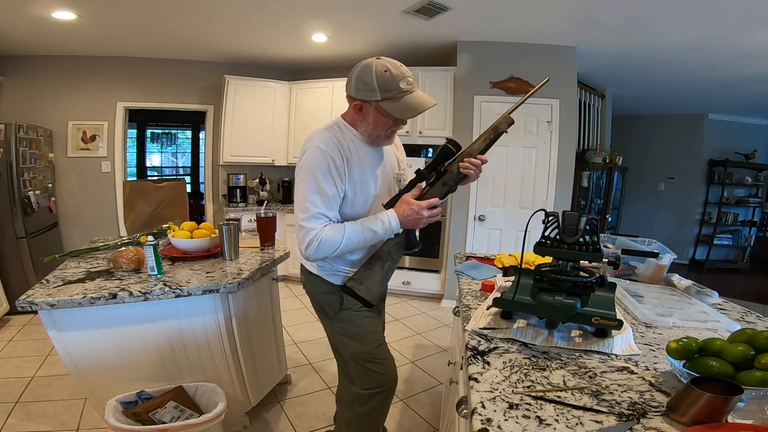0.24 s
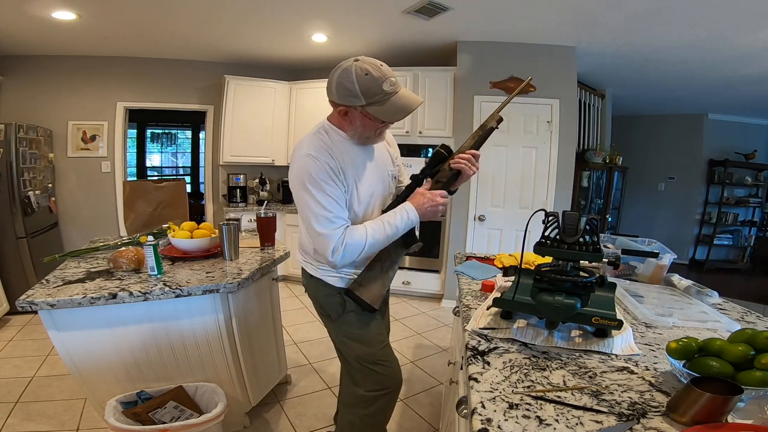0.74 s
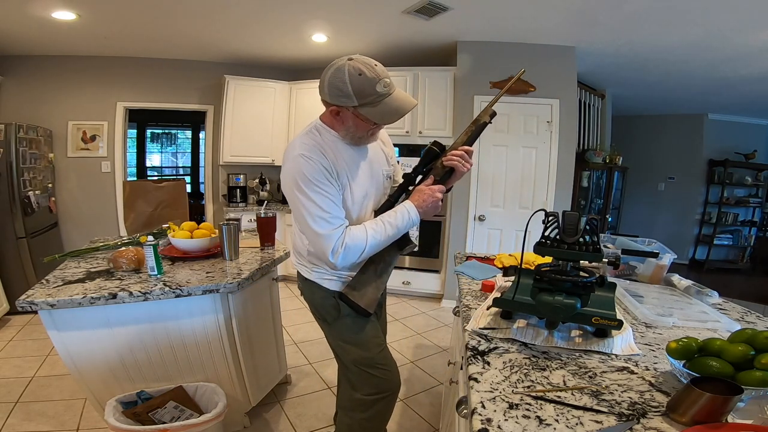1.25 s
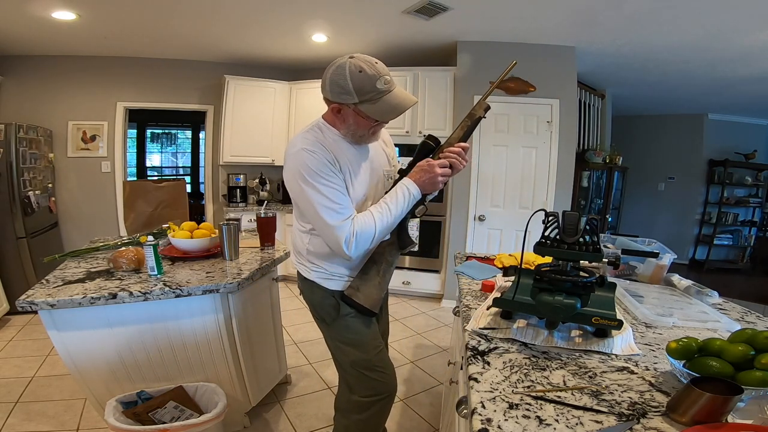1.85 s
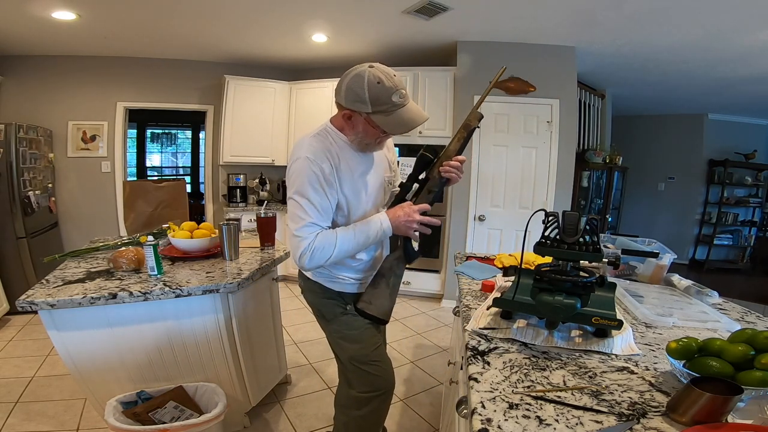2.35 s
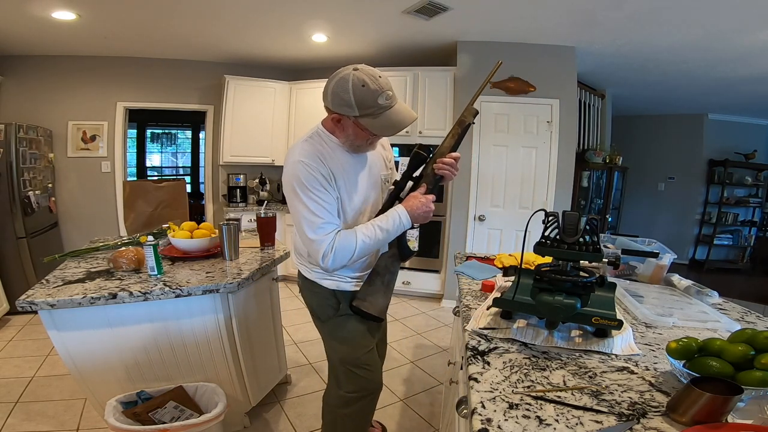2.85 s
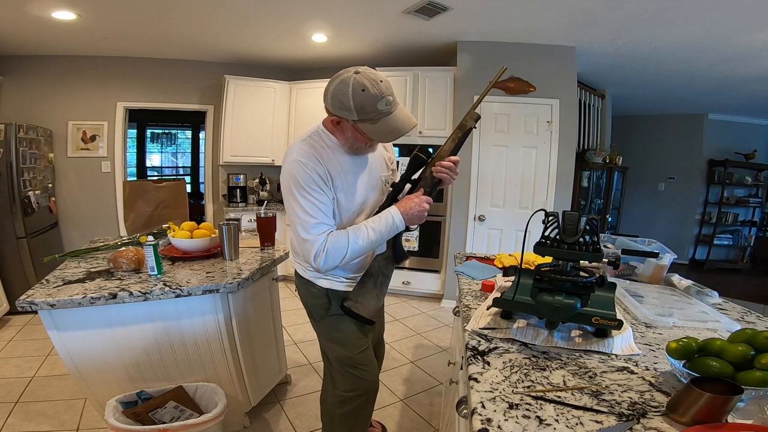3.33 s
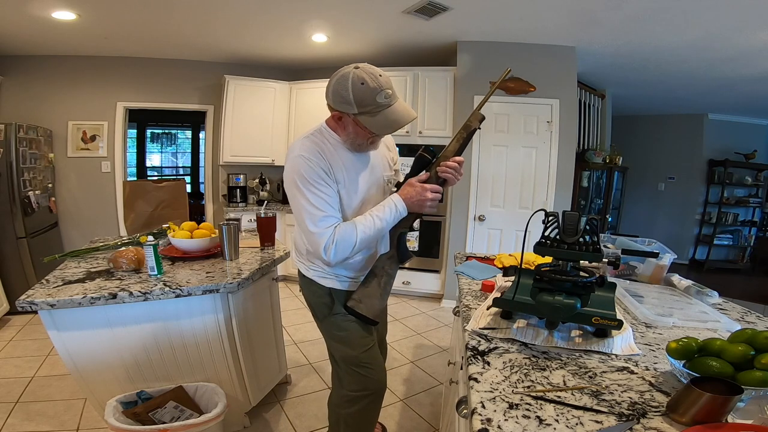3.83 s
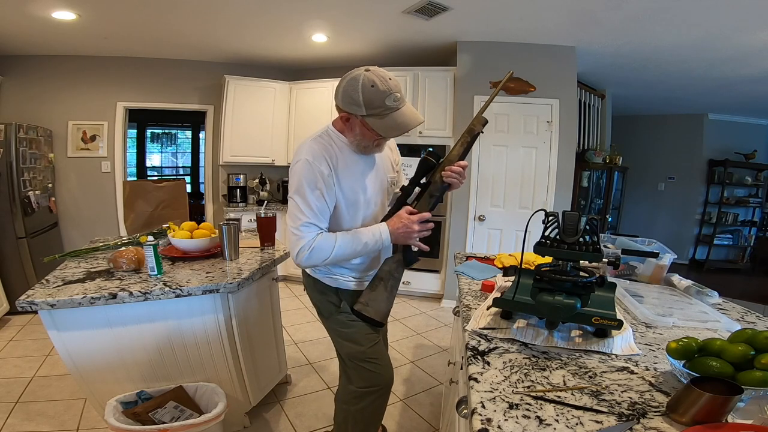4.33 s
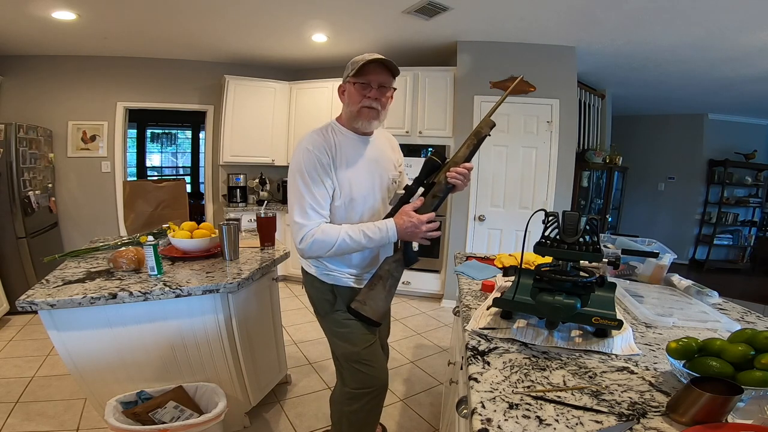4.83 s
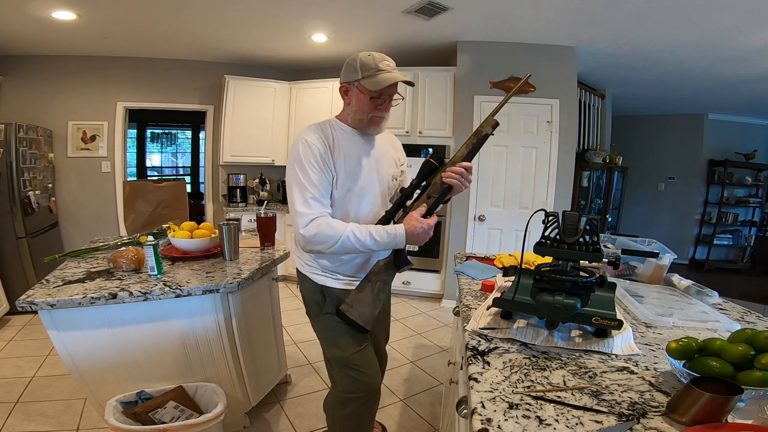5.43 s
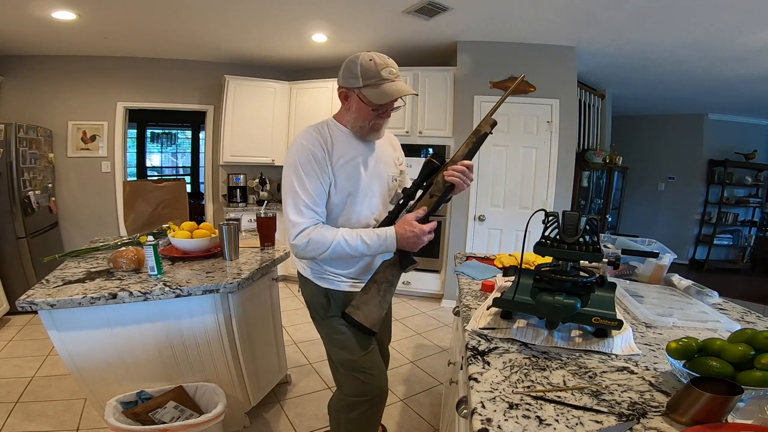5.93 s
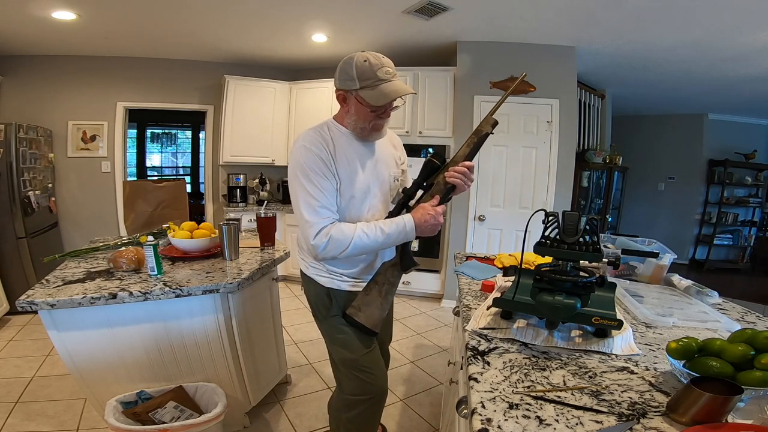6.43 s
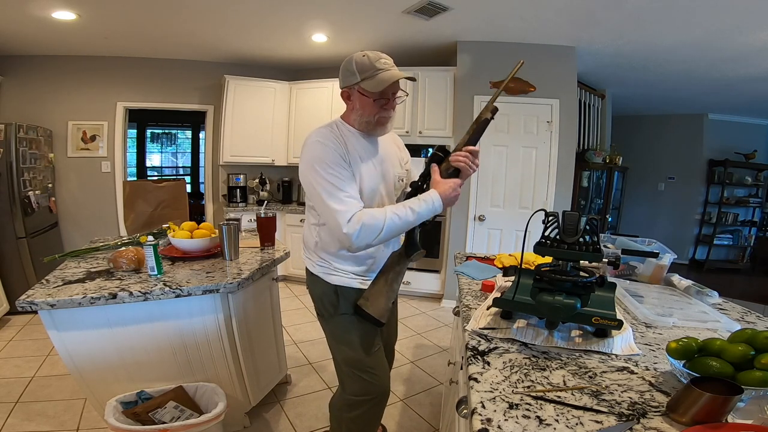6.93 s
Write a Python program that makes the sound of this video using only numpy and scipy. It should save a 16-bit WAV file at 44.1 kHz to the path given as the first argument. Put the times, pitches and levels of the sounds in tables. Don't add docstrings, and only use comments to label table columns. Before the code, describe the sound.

A close, hard-surfaced kitchen with low house rumble, faint hiss and wavering appliance hum. At 0 s the end of a bolt scrape meets a metallic clack and a hollow latch knock in the rifle stock. Very faint finger ticks follow. At 1.42 s the bolt releases, knocks along its rails and slams at about 1.46 s, a bright burst of rattling steel with quick bounces, a microphone overload pop and a ringing room tail. From 2.13 s it is drawn again in gritty clicks, strikes its stop at 2.33 and latches at 2.47. It slams again at 3.56. The third draw runs from 4.1 to 4.43, with a heavier low thump and latch, while the stereo image shrinks almost to mono. Faint hum, skin and sling ticks fill the wait as the image reopens, then a slightly softer slam lands at 6.49, ringing away to light touches near 7 s.

```python
import sys
import numpy as np
from scipy import signal
from scipy.io import wavfile
from scipy.ndimage import uniform_filter1d

SR = 44100
rng = np.random.default_rng(int(sys.argv[2]) if len(sys.argv) > 2 else 0)


def gain_from_db(level_db):
    decades = np.asarray(level_db, float) / 20
    return 10 ** decades


def log_audio(samples):
    frames = np.atleast_2d(samples).T
    limited = np.clip(frames, -1, 1)
    pcm = np.round(limited * 32767).astype(np.int16)
    wavfile.write(sys.argv[1], SR, pcm)


N = 316461


def evened(x):
    return x / np.sqrt(np.mean(x ** 2) + 1e-20)


def read(points, hz):
    f, value = np.transpose(points)
    return np.interp(np.log(hz + 1), np.log(f + 1), value)


def curve(rows, column):
    rows = np.array(rows)
    return np.interp(np.arange(N) / SR, rows[:, 0], rows[:, column])


def split(x, hz, order=2):
    low = signal.sosfiltfilt(signal.butter(order, hz, fs=SR, output="sos"), x)
    return low, x - low


def slow_noise(count, seconds):
    span = round(seconds * SR)
    return uniform_filter1d(uniform_filter1d(rng.standard_normal((count, N)), span), span)


def noise_pair(count, size, same, shape_db):
    hop = size // 4
    frames = count // hop + 5
    hz = np.fft.rfftfreq(size, 1 / SR)[:, None]
    a, b, c, d = rng.standard_normal((frames, len(hz), 4)).T
    like = np.clip(read(same, hz), -1, 1)
    left = a + 1j * b
    right = like * left + np.sqrt(1 - like ** 2) * (c + 1j * d)
    spectra = np.array([left, right]) * gain_from_db(shape_db(hz, np.arange(frames) * hop / SR))
    return signal.istft(spectra, nperseg=size, noverlap=size - hop)[1][:, :count]


def ring(modes, lo_hz, hi_hz, blur=1):
    t = np.arange(3000) / SR
    h = np.zeros(len(t))
    for hz, width, db in modes:
        decay = np.exp(-np.pi * width * blur * t)
        h += gain_from_db(db) * np.sqrt(width) * decay * np.sin(2 * np.pi * hz * t)
    h = signal.sosfilt(signal.butter(2, [lo_hz, hi_hz], "band", fs=SR, output="sos"), h)
    return h / np.linalg.norm(h)


def knocked(rows, h, duck_db):
    knock_ms = .8
    knocks = np.zeros(N)
    h = np.convolve(h, np.hanning(round(knock_ms * SR / 1000)))
    for s, db in rows:
        at = round(s * SR)
        knocks[at] = gain_from_db(db - duck_db[at + 90])
    return signal.oaconvolve(knocks, h / abs(h).max())[:N]


# t/s, bass side level/dB
FOLD = [
    (0, -1),
    (3.7, -4),
    (4.0, -16),
    (4.2, -20.5),
    (4.45, -37.5),
    (5.5, -33),
    (5.7, -23),
    (5.9, -10),
    (7.18, -7),
]


def treble_side_db():
    full_db, power = -42.5, 1.7
    return full_db * abs(curve(FOLD, 1) / full_db) ** power


def quiet_s():
    t = np.arange(N) / SR
    last = np.sort([row[0] for row in FLIGHTS + LATCHES])
    return t - last[np.maximum(np.searchsorted(last, t) - 1, 0)]


# f/Hz, level/dB per Hz
AIR = [(15, -51.5), (25, -16), (91, -14), (129, -6.5), (178, -15.5), (297, -17), (567, -33), (848, -29),
       (919, -34.5), (1200, -36), (3000, -43), (3260, -45.5), (4620, -45), (7700, -48), (15500, -67)]
# f/Hz, likeness [-1 to 1]
AIR_SAME = [(60, 1), (150, 0.84), (380, 0.69), (950, -0.46), (2380, 0.35), (5980, 0.82), (15000, -0.87)]
# t/s, rumble level/dB
OPENING = [(0.0, -60), (0.66, -56), (1.44, -54), (1.74, -66), (2.5, -57.5), (2.68, -60), (3.57, -55),
           (3.79, -65.5), (4.09, -58.5), (4.31, -53), (4.71, -55), (5.17, -50.5), (6.47, -50.5),
           (6.69, -58.5), (7.17, -59.5)]


def air():
    hiss_db, follows = -63, 0.37
    hiss_folds, fizz_folds = -0.087, .25
    hiss_sinks, fizz_sinks = 3.5, 4
    low, high = split(noise_pair(N, 2048, AIR_SAME, lambda hz, s: read(AIR, hz) + 0 * s), 500)
    hush, fizz = split(evened(high), 4000)
    open_db, fold_db, quiet = curve(OPENING, 1), treble_side_db(), quiet_s()
    fizz = fizz * gain_from_db(fizz_folds * fold_db - fizz_sinks * quiet)
    level_db = hiss_db - hiss_sinks * quiet + hiss_folds * fold_db
    level_db = level_db + follows * (open_db - open_db.mean())
    return evened(low) * gain_from_db(open_db) + (hush + fizz) * gain_from_db(level_db)


# start t/s, top t/s, end t/s, top level/dB, end level/dB
STROKES = [
    (-.3, 0, .1, -28.5, -51),
    (2.14, 2.28, 2.46, -36, -37),
    (4.07, 4.29, 4.42, -31, -54),
]


def hand_strokes():
    swell_db, stock_db, bolt_db = -36.5, -5, -11.5
    return [((a, top, b), (db + swell_db, db, end_db), stock_db, bolt_db) for a, top, b, db, end_db in STROKES]


# t/s, peak level/dB, then stock, magazine and bolt level/dB
DRAWS = [(.0044, -29, -32, 4.5, 7), (2.131, -53, 5.5, 7.5, -19), (2.199, -48, 2, -3.5, -22),
         (2.2248, -28.5, -3.5, 6.5, -5.5), (2.256, -21.5, -8, -3.5, -5), (2.275, -31.5, -14, 0.5, -13),
         (2.295, -28.5, -11.5, -15, 0.5), (2.3042, -18, -18.5, -14, -2), (2.3117, -22.5, -13, -4, 6),
         (2.36, -22.5, -9, -16.5, -2), (4.154, -28, 5.5, 8.5, -16), (4.188, -25, -5, 1.5, -11.5),
         (4.233, -38, -16.5, 17, -28), (4.241, -31, -12, -8, 4.5), (4.2511, -26, -22, 2, -0.5),
         (4.285, -22, 7, -4.5, -11.5), (4.342, -31.5, -14.5, -2, -25)]


def draws():
    rattle_ms = 7
    return [(*row, rattle_ms) for row in DRAWS]


# t/s, peak level/dB
LATCHES = [
    (.005, -12.5),
    (2.467, -14),
    (4.428, -11.5),
]
# f/Hz, width [Hz], level/dB
HOLLOW = [(550, 27, 5), (599, 33, -4.5), (515, 68, -12), (1082, 57, -3), (1666, 140, -1)]


def latch(duck_db):
    bounce_s, bounce_db = 0.063, -15.5
    drops = LATCHES + [(s + bounce_s, db + bounce_db) for s, db in LATCHES]
    return gain_from_db(4.0) * knocked(drops, ring(HOLLOW, 400, 2200), duck_db)


# start t/s, length [s], rms level/dB, f/Hz
SWELLS = [(.125, .14, -52.5, 118.6), (.3, .12, -54, 117.3), (.486, 0.32, -49.5, 123.4),
          (.839, 0.13, -50, 124.4), (1.023, .12, -48.5, 123.6), (1.16, .11, -48.5, 126),
          (1.28, .1, -57, 148.8), (2.8, 0.28, -57, 147), (3.16, .2, -62, 119.7), (3.37, 0.1, -56, 149),
          (4.82, .04, -54, 130), (5.04, .12, -57, 153.2), (5.2, 0.13, -54, 148), (5.39, .25, -57.5, 131),
          (5.65, 0.048, -52.5, 145.8), (5.82, 0.27, -56, 125), (6.13, 0.21, -55.5, 130)]


def hum():
    waver_hz, waver_db, waver_s = 3.34, 1.5, 0.034
    hz, size = np.zeros(N), np.zeros(N)
    for s, length, db, tone_hz in SWELLS:
        at = slice(round(s * SR), round((s + length) * SR))
        hz[at] = tone_hz
        size[at] = gain_from_db(db) * signal.windows.tukey(at.stop - at.start, .6)
    drift, flutter = (evened(v) for v in slow_noise(2, waver_s))
    tone = np.sqrt(2) * np.sin(2 * np.pi * np.cumsum(hz + waver_hz * drift) / SR)
    return tone * size * gain_from_db(waver_db * flutter) * gain_from_db([[-.6], [.6]])


# t/s, peak level/dB, stock and magazine level/dB, bolt level/dB
TOUCHES = [(0.446, -59, -1, -7), (0.79, -67, 0, 0), (0.8796, -66, -9, -2), (0.9283, -69.5, 0, -1),
           (1.0345, -64, -0.5, -26), (1.1563, -59.5, -12.5, -5.5), (1.3524, -63, 6.5, -23),
           (4.9242, -70, 12, -1), (5.0698, -51, -16, -0.5), (5.8992, -65, -10.5, -17.5),
           (5.9493, -66, -7, -21), (6.12, -70.5, -8, 0), (6.1999, -72, 6, -11), (6.2294, -75, 4, -20),
           (6.3694, -66, 5, -11), (7.006, -47.5, -1.5, -5.5), (7.018, -68, -3, 0), (7.0684, -59, -1, -3),
           (7.1094, -63, 11.5, -20)]


def touches():
    rattle_ms = 61
    return [(s, db, low, low, bolt, rattle_ms) for s, db, low, bolt in TOUCHES]


# release t/s, release level/dB, travel [ms], slam level/dB, extra stock level/dB in the bounces
FLIGHTS = [
    (1.4195, -18, 42.3, -6.5, -1),
    (3.5178, -19, 42.8, -6.5, -1),
    (6.4468, -22, 42.9, -8, 5),
]
# delay [ms], level/dB re slam, stock and magazine level/dB, bolt level/dB, rattle [ms]
BOUNCES = [
    (5.1, -6, -7, 3, 3.7),
    (11, -12, -4, 5, 12),
]


def flights():
    sear, slam = (-9, 0, 0, 5), (-8, -11, 0, 2.6)  # stock, magazine, bolt dB; rattle ms
    rows = []
    for s, db, ms, slam_db, stock in FLIGHTS:
        home = s + ms / 1000
        rows += [(s, db, *sear), (home, slam_db, *slam)]
        for late, less, low, bolt, rattle in BOUNCES:
            rows.append((home + late / 1000, slam_db + less, low + stock, low, bolt, rattle))
    return rows


def bolt_runs():
    from_ms, db, stock_db, bolt_db = 13, -32.5, -5.5, -3.5
    return [((s + from_ms / 1000, s + ms / 1000), (db, db), stock_db, bolt_db) for s, _, ms, *_ in FLIGHTS]


# t/s, peak level/dB, magazine level/dB
RAIL_KNOCKS = [
    (1.4345, -14, 2),
    (1.439, -10, -10),
    (1.4445, -10, -14),
    (3.5245, -16, -8),
    (3.533, -10, -3),
    (3.5385, -14, -5),
    (3.591, -22, -6),
    (6.454, -22, -3),
    (6.4622, -13, 7),
    (6.4775, -14, 0),
]


def rail_knocks():
    stock_db, bolt_db, rattle_ms = -11, -14, 4.5
    return [(s, db, stock_db, lips, bolt_db, rattle_ms) for s, db, lips in RAIL_KNOCKS]


# t/s, peak level/dB
JOLTS = [
    (1.465, -29.5),
    (2.33, -33),
    (3.563, -27.5),
    (4.235, -30.5),
    (4.275, -19.5),
    (6.493, -52.5),
]
# f/Hz, width [Hz], level/dB
BUTT = [(314, 24, 7), (367, 25, -2.5), (250, 70, -9)]


def butt(duck_db):
    return gain_from_db(2.5) * knocked(JOLTS, ring(BUTT, 310, 380), duck_db)


# port hit hardest, height there, height in the other port, its delay [ms], half width [ms]
OVERLOADS = [
    (0, .45, .22, 9.7, 1.7),
    (0, .52, .08, 10.6, 1.2),
    (1, .48, -.38, 8.2, .9),
]
# time after the slam [ms], share of height, half width [ms]
HARD_POP = [
    (2.7, .17, 1.1),
    (7.8, 1, .85),
    (11, -.2, 1.4),
]


def pops():
    sag_hz, dip = 22, (6.4, -.3, .9)
    out = np.zeros((2, N))
    ms = 1000 * np.arange(-600, 1400) / SR
    for (s, _, travel, *_), (port, hard, soft, lag, wide) in zip(FLIGHTS, OVERLOADS):
        at = round((s + travel / 1000) * SR)
        for side, height, bumps in ((port, hard, HARD_POP), (1 - port, soft, [dip, (lag, 1, wide)])):
            for late, share, width in bumps:
                bump = np.exp(-.5 * ((ms - late) / width) ** 2)
                out[side, at - 600:at + 1400] += height * share * bump
    return signal.lfilter(*signal.butter(1, sag_hz, "high", fs=SR), out)


# t/s, peak level/dB, magazine level/dB, bolt level/dB
STOPS = [
    (2.3288, -9, -5, -6),
    (4.273, -13, 0, -9),
]


def stops():
    stock_db, rattle_ms = -9, 4.5
    return [(s, db, stock_db, lips, bolt, rattle_ms) for s, db, lips, bolt in STOPS]


# t/s, peak level/dB, magazine level/dB, bolt level/dB, rattle [ms]
SNAPS = [
    (2.455, -26.5, 2, -15, 5.6),
    (2.4667, -16.5, -6.5, -1.5, 5.3),
    (2.473, -29, -7, -4.5, 9),
    (4.419, -35.5, 9, -19, 7.2),
    (4.427, -22, 4.5, -7, 16),
]
TICKS = [
    (3.507, -52, -8, 3, 3),
    (4.118, -44.5, 0, -18, 5),
    (6.163, -58, 14, -14, 18),
    (6.21, -62, -10, -12, 45),
    (6.43, -54, 0, -14, 25),
]


def snaps_and_ticks():
    stock_db = -12
    return [(s, db, stock_db, *rest) for s, db, *rest in SNAPS + TICKS]


def blows(hand_db=0):
    by_hand = [(s, db + hand_db, *rest) for s, db, *rest in draws() + stops()]
    return by_hand + flights() + rail_knocks()


def ducking_db(share=0.39, knee_db=-42, back_db=70):
    over = np.zeros(N)
    for s, db, *_ in blows(hand_db=-7.5):
        over[round(s * SR)] = share * max(db - knee_db, 0)
    fall = np.arange(N) * back_db / SR
    return -uniform_filter1d(np.maximum.accumulate(over + fall) - fall, 90)


# f/Hz, width [Hz], level/dB
STOCK = [(587, 60, -16), (823, 48, -1), (1010, 45, -1.5), (730, 760, -2)]
MAGAZINE = [(1300, 360, -11.5), (1374, 82, -9), (1680, 54, -11.5), (1610, 2100, 6)]
RECEIVER = [(2706, 150, -2.5), (3290, 220, -2.5), (3840, 250, -3.5), (4350, 120, -9.5), (3170, 6200, 6.5)]
BOLT = [(4970, 340, -2.5), (5680, 400, -8.5), (6050, 410, -5), (7650, 500, -2.5), (8180, 120, -8.5),
        (9850, 430, -9.5), (6634, 1300, 3), (13100, 15000, 1.5)]
# lowest f/Hz, highest f/Hz
RANGES = [
    (380, 1200),
    (1100, 2100),
    (2000, 4900),
    (4500, 17000),
]


def gun(duck_db):
    firm_gain, firm_ms = 4.5, 7
    drive = np.zeros((4, N + 6000))
    firm = np.zeros(drive.shape)
    t = np.arange(6000) / SR
    contacts = evened(rng.standard_normal(drive.shape) * gain_from_db(5.8 * rng.standard_normal(N + 6000)))
    for s, db, stock, magazine, bolt, ms in blows() + touches() + snaps_and_ticks():
        at = round(s * SR)
        force = gain_from_db(db + np.array([stock, magazine, 0, bolt]) - duck_db[min(at + 90, N - 1)])
        drive[:, at:at + 6000] += force[:, None] * np.exp(-1000 * t / max(ms, .5))
        firm[:, at] += firm_gain * np.exp(-ms / firm_ms) * force
    for s, db, stock, bolt in hand_strokes() + bolt_runs():
        at = np.arange(max(round(s[0] * SR), 0), round(s[-1] * SR))
        level_db = np.interp(at / SR, s, db) + 7.5 - duck_db[at]
        drive[:, at] += [gain_from_db(level_db + part) for part in (stock, 0, 0, bolt)]
    parts = list(zip(drive * contacts + firm, (STOCK, MAGAZINE, RECEIVER, BOLT), RANGES))
    heard = []
    for blur in (1, 4):
        heard.append(sum(signal.oaconvolve(d, ring(modes, *edges, blur))[:N] for d, modes, edges in parts))
    return np.array(heard)


# f/Hz, time to fall 60 dB [s]
KITCHEN = [(300, 0.13), (600, 0.68), (1500, 0.79), (4000, 0.7), (8000, 0.58), (11000, 0.42), (15000, 0.47)]
# f/Hz, level/dB
KITCHEN_TONE = [(250, -9.5), (500, 5), (1200, 0.5), (3000, -4), (7000, 5.5), (12000, 1)]
# f/Hz, likeness [-1 to 1]
ROOM_SAME = [(300, .88), (640, .5), (1400, .33), (3100, .5), (5000, .3), (7000, .05)]
# delay [ms], port, level/dB
WALLS = [(1.1, 0, -15), (1.7, 1, -9), (3.4, 1, -12.5), (4.6, 0, -11.5), (7.9, 0, -6.5), (9.3, 1, -11)]


def kitchen(near, around, wet_db=-5.5, rise_s=0.00091, shift_s=0.011, spots=6):
    out = np.zeros((2, N))
    length = SR * 3 // 4
    rise = 1 - np.exp(-np.arange(length) / SR / rise_s)
    shares = slow_noise(spots, shift_s)
    for share in shares / np.linalg.norm(shares, axis=0):
        tail = noise_pair(length, 256, ROOM_SAME, lambda hz, s: read(KITCHEN_TONE, hz) - 60 * s / read(KITCHEN, hz))
        tail *= rise * gain_from_db(wet_db) / np.linalg.norm(tail[0])
        out += signal.fftconvolve((around * share)[None], tail, axes=1)[:, :N]
    for ms, port, db in WALLS:
        lag = round(ms * SR / 1000)
        out[round(port), lag:] += gain_from_db(db) * near[:-lag]
    return out


# f/Hz, level/dB
MIC = [(200, -14), (450, -5), (1000, -7.5), (8500, -3.5), (9500, -2), (10600, -7), (11300, -14),
       (14000, -13), (15700, -25.5)]


def scene():
    duck_db = ducking_db()
    near, around = gain_from_db(-2.0) * (gun(duck_db) + latch(duck_db) + butt(duck_db))
    heard = near * gain_from_db([[-.8], [.8]]) + kitchen(near, around)
    hz = np.linspace(0, SR / 2, 129)
    colour = signal.firwin2(255, hz, gain_from_db(read(MIC, hz)), fs=SR)
    return signal.oaconvolve(heard, colour[None], "same") * gain_from_db(duck_db) + air() + hum()


def roll_off(x):
    return signal.sosfilt(signal.butter(12, 15740, fs=SR, output="sos"), x)


def record(dry):
    side_db, side_top_db = 1, 2.5
    dulls, lifts = .1, .2
    mid, side = (dry[0] + dry[1]) / 2, (dry[0] - dry[1]) / 2
    fold_db = curve(FOLD, 1)
    low, high = split(side, 500)
    high = high + split(high, 6500)[1] * (gain_from_db(side_top_db) - 1)
    side = low * gain_from_db(fold_db) + high * gain_from_db(side_db + treble_side_db())
    for hz, slope in ((9000, dulls), (11000, -lifts)):
        mid = mid + split(mid, hz, order=8)[1] * (gain_from_db(slope * fold_db) - 1)
    mix = np.array([mid + side, mid - side]) + pops()
    return roll_off(mix)


dry = scene()
out = record(dry)
log_audio(out)
```